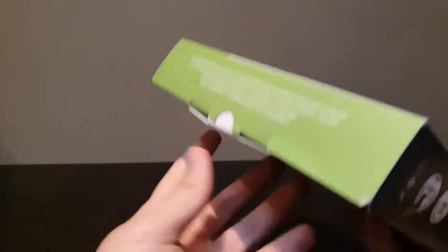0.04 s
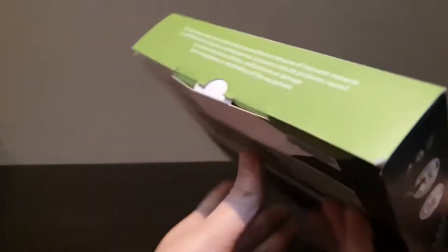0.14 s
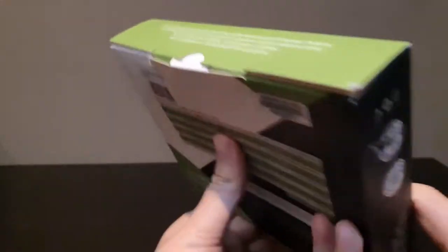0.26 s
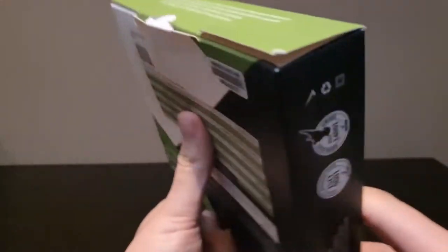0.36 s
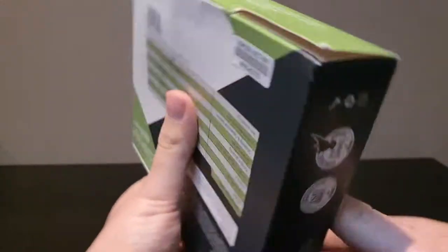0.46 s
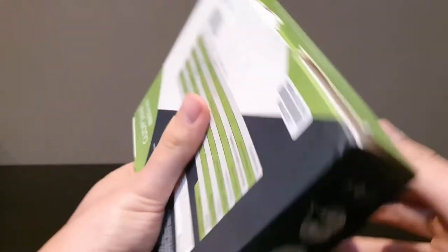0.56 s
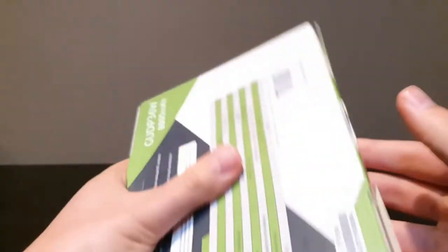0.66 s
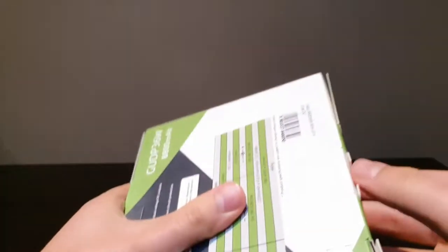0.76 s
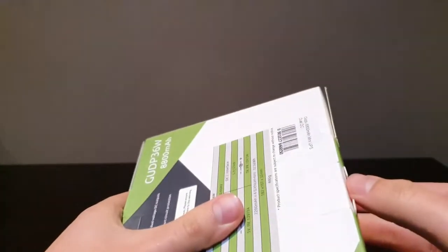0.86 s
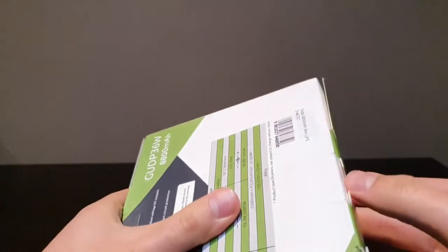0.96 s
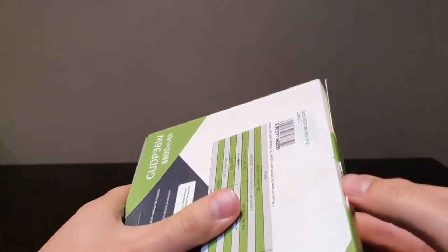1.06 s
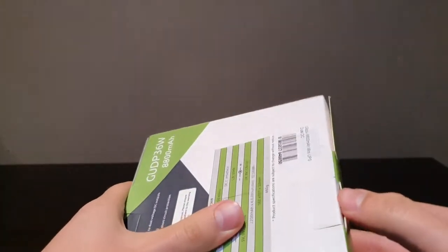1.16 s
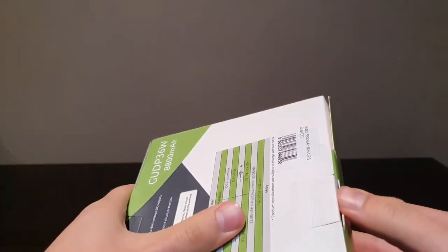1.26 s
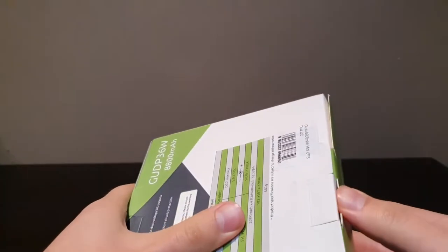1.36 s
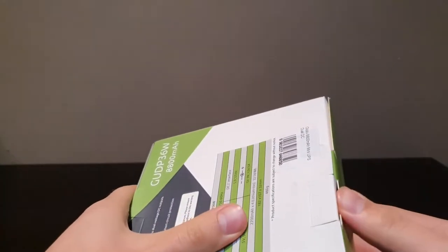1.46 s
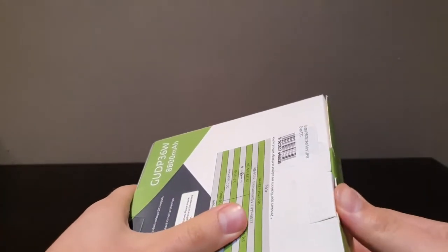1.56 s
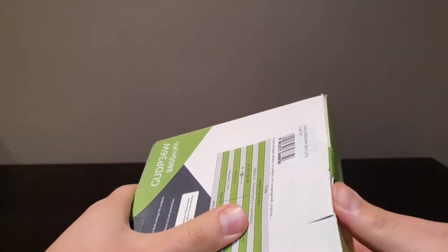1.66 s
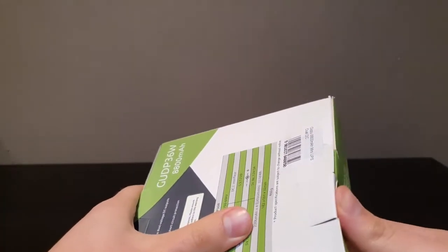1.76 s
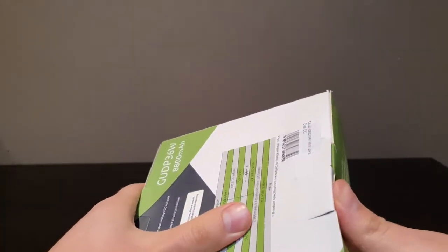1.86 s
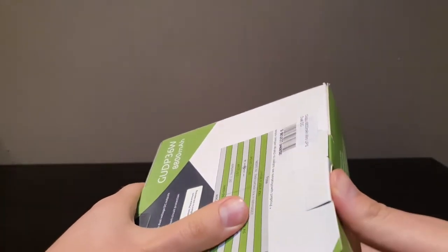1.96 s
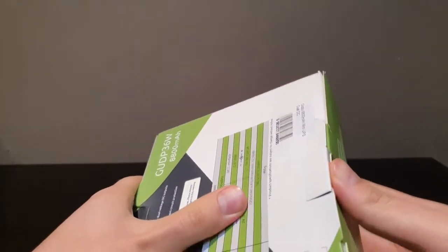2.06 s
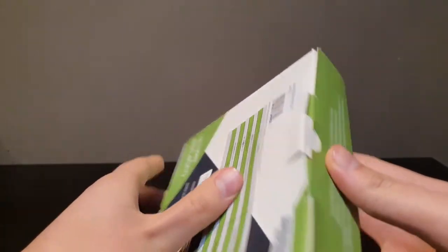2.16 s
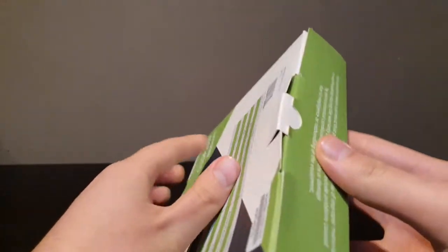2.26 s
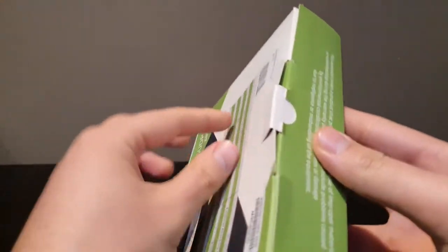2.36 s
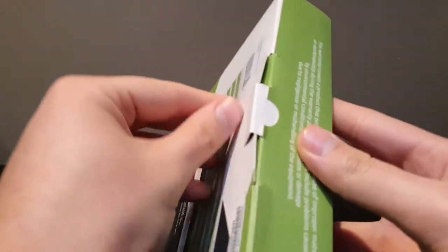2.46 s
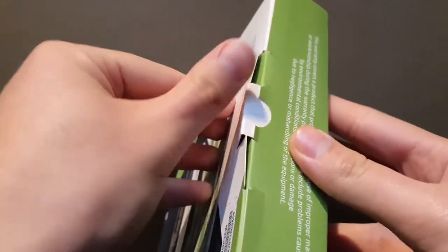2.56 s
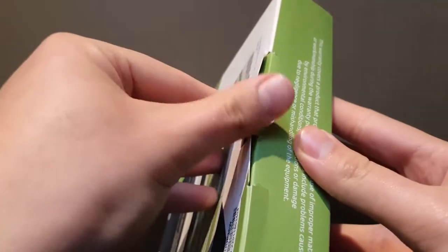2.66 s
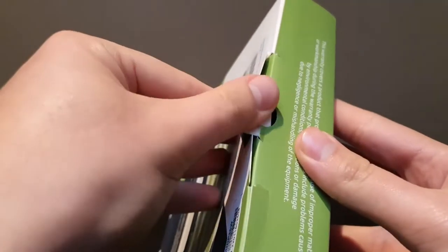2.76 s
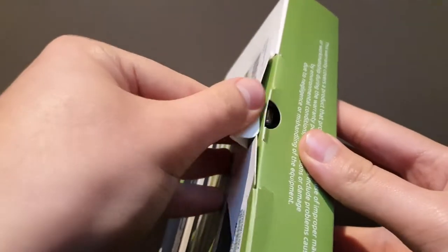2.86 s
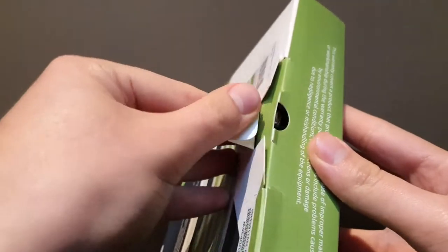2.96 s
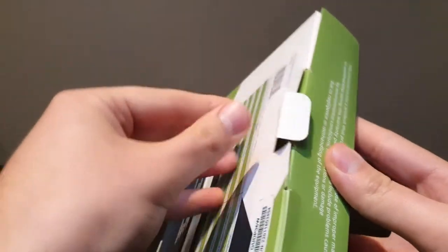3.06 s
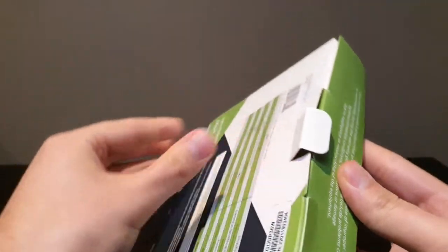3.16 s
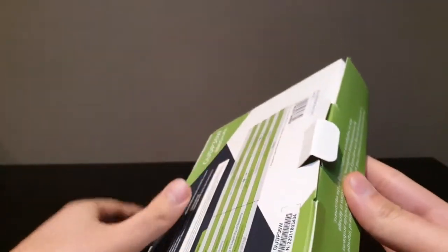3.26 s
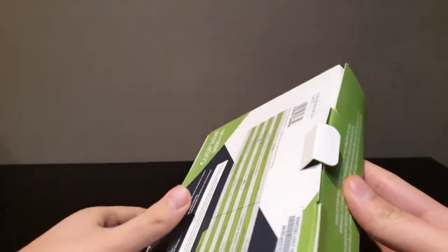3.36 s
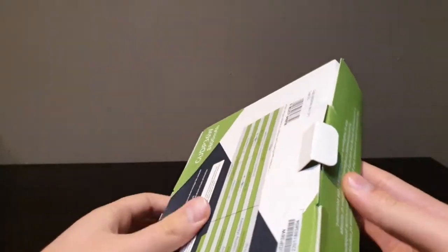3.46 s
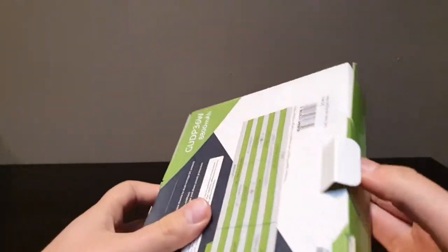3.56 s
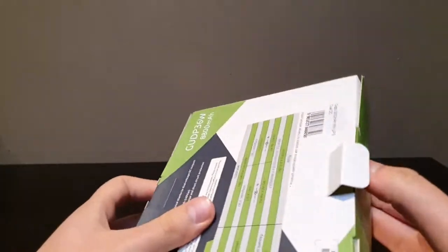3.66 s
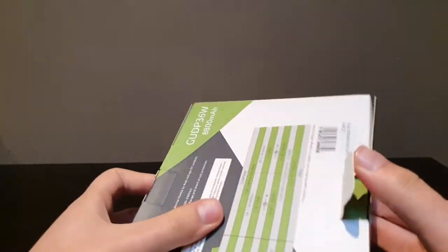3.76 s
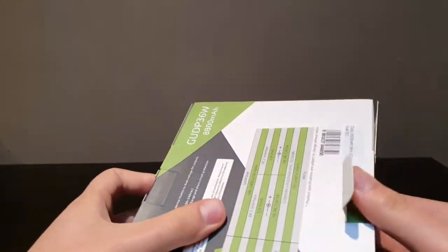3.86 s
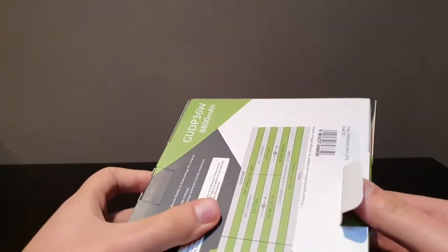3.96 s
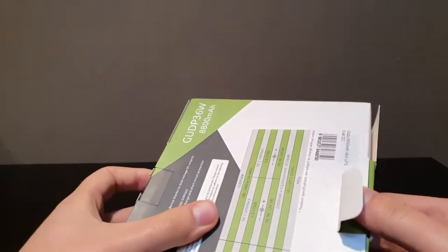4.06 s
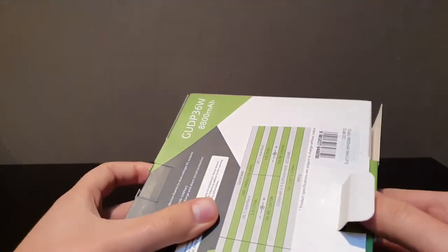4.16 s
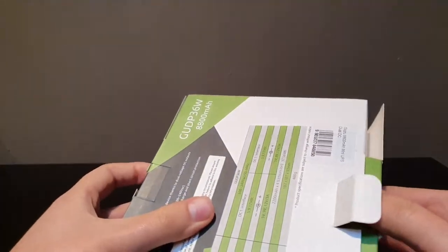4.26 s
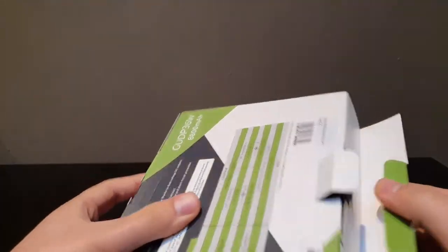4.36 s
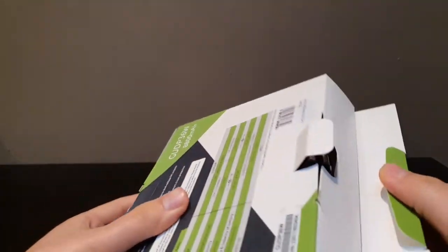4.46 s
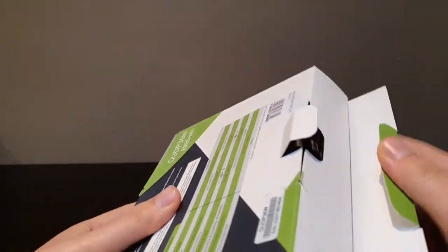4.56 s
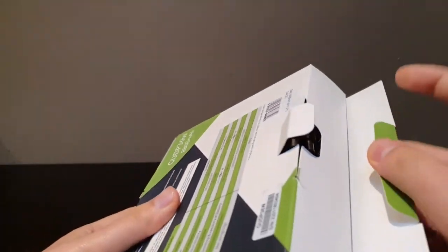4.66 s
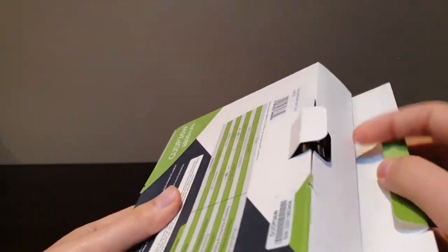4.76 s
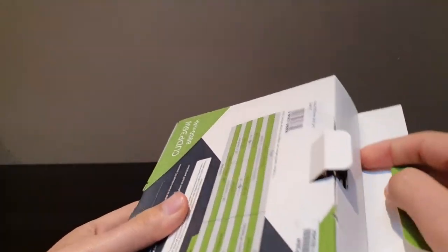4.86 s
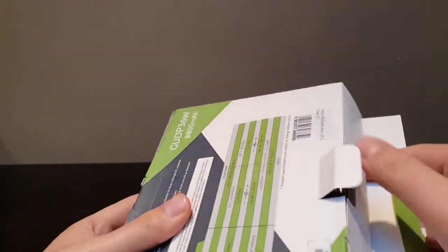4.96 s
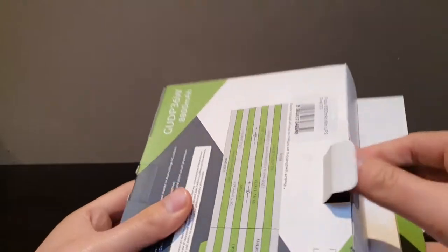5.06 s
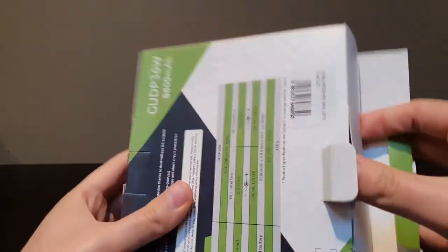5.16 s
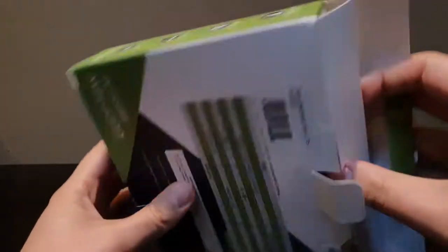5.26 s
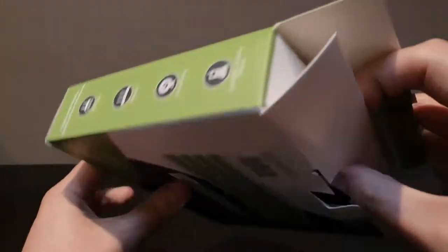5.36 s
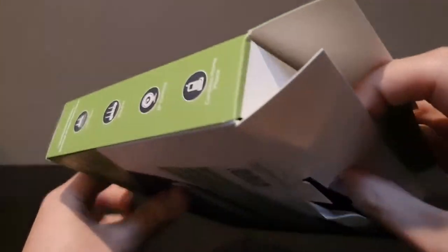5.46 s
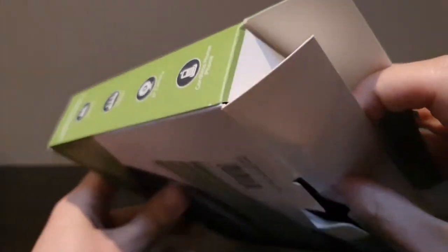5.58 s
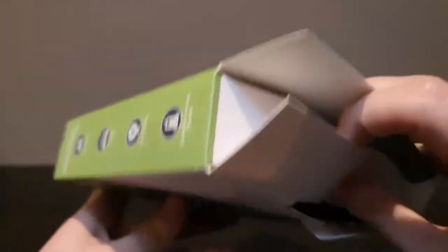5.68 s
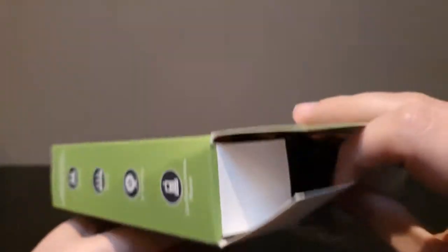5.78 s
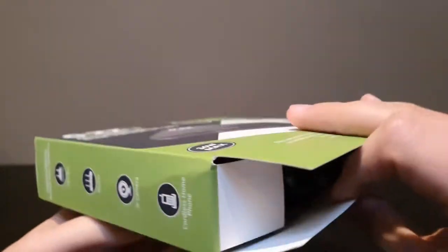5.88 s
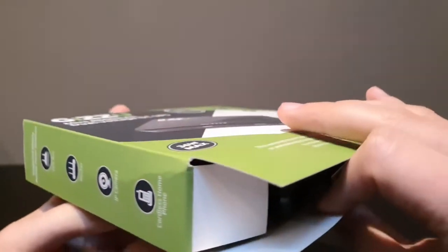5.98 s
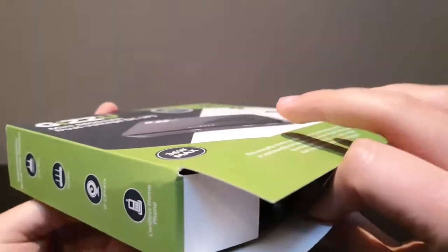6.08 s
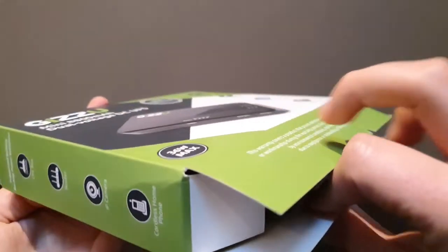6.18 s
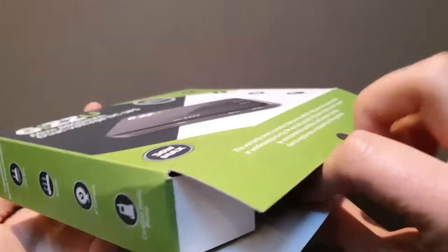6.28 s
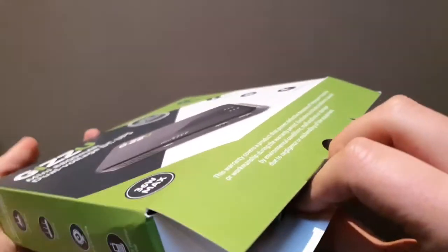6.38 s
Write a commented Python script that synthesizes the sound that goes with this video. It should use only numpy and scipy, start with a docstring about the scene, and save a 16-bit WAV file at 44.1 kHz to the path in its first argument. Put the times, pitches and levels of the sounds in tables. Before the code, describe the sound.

Fingers rub and knock a thin, hollow cardboard box very close to a stereo microphone in a small quiet room. After sparse taps and faint rubbing, a locking tab catches and rasps sharply out of its slot. A fingertip judders softly, the lid creaks in quick jerks, and a flap scrapes free with a crisp snap. Busier knocks, thumps and rubbing finish the handling.

```python
"""Hands knock, snap and fold a thin cardboard box, close to two microphones in a small room.
Each snap is a short broadband blow through the resonances of the panels. The lid creaks in jerks,
its flap scrapes free and the locking tab rasps out of its slot, as grains of friction through card modes.
Fingers rub, tick and judder on the panels, which flex in the grip; reverberation and quiet air surround them."""
import sys
import numpy as np
from scipy import signal
from scipy.fft import rfft, irfft, next_fast_len
from scipy.io import wavfile
from scipy.ndimage import uniform_filter1d, map_coordinates

SR = 44100
rng = np.random.default_rng(int(sys.argv[2]) if len(sys.argv) > 2 else 0)


def pcm_store(signal):
    """Save signal as 16-bit PCM."""
    levels = np.round(np.clip(np.atleast_2d(signal), -1, 1) * 32767)
    wavfile.write(sys.argv[1], SR, levels.astype(np.int16).T)


N = 283122
TAPS = 4096  # length of a blow and of a body's response, in samples
HZ = np.fft.rfftfreq(TAPS, 1 / SR)
EDGE_HZ = 16250  # upper band limit

# Quiet air. Each row: frequency in Hz, spectral level in relative dB.
AIR_TONE = [(20, -12.5), (45, 2), (62, -4), (100, -15), (200, -18.5), (600, -16), (2000, -31.5),
            (6000, -30.5), (16000, -45.5)]
# Decay of the room. Each row: frequency in Hz, reverberation time (60 dB) in seconds.
ROOM_T60 = [(100, .5), (260, 0.42), (700, 0.34), (1840, 0.46), (4850, 0.32), (12800, 0.51)]
# Strength of the room. Each row: frequency in Hz, level of the reverberation in relative dB.
ROOM_LEVEL = [(60, -4), (150, -8.5), (290, -0.5), (700, -8.5), (1500, -8.5), (3500, -5.5), (7000, -6),
              (15000, -10)]
# Coherence of the direct sound. Each row: frequency in Hz, left-right correlation (1 is identical).
COHERENCE = [(50, 0.95), (130, 0.96), (500, 0.9), (1200, 0.78), (2500, 0.2), (6000, 0.16), (15000, 0.3)]
# The box moves before the microphones. Each row: time in seconds, lead of the left one in ms.
BEARING = [(0, 0.051), (1.2, 0.16), (2.1, 0.075), (2.9, 0.1), (3.3, 0.15), (3.75, -0.044), (4.4, -0.057),
           (5.3, -0.069), (5.8, 0.033), (6.4, 0.049)]
# The two microphones differ in colour. Each row: frequency in Hz, left minus right in dB.
MIC_BALANCE = [(60, -3), (200, 0), (600, -0.5), (2500, 0.5), (4800, -1.5), (8500, 1), (13000, 2)]

# Resonances of the panels, lid, tab and flap. Each row: frequency in Hz, width in Hz, height in dB.
BOX_MODES = [(283.7, 74, 6), (388, 43, 2), (565, 92, 3), (664, 32, 3), (1185, 110, 3.5), (1550, 150, 1),
             (1830, 150, 3.5), (2020, 68, 0), (3240, 630, 0), (6300, 1500, 4.5)]
LID_MODES = [(177.5, 76, 7.5), (655, 190, 10.9), (924, 86, 5.3), (1150, 100, 4.6), (1400, 290, 9)]
TAB_MODES = [(1120, 87, 8.6), (1395, 320, 6.3), (2154, 83, 8.4), (3190, 260, 10.3), (4450, 160, 5.4),
             (5600, 360, 4)]
FLAP_MODES = [(1174, 150, 5), (1810, 180, 3.3), (2200, 150, 3.7), (2950, 550, 6), (3920, 440, 7.5)]
# Spectra of the driving forces. Each row: frequency in Hz, spectral level in relative dB.
FLEX_TONE = [(20, -35), (44, -9), (67, 9.5), (110, -2), (200, -8.5), (320, -13), (700, -31), (3000, -70)]
RUB_TONE = [(100, -14.5), (280, 4.5), (700, 2), (1900, -1.5), (3000, -9.5), (5000, -14.5), (9000, -25),
            (16000, -38.5)]
HISS_TONE = [(1000, -32.5), (3000, 6.5), (5000, 4.5), (7500, -1), (12500, -3), (16000, -4.5)]
JUDDER_TONE = [(30, -22), (70, 14), (120, 1.5), (195, 5.5), (300, -10.5), (450, -16.5), (900, -48),
               (4000, -68)]
TAB_TONE = [(60, -37), (300, -12), (650, -13), (1050, -2.5), (2000, -3), (2700, -8), (6100, -6),
            (7200, -17.5), (16000, -15.5)]
FLAP_TONE = [(60, -20), (300, -6), (800, -5), (1200, 0.5), (3600, -5), (5000, -12), (8000, -13),
             (16000, -27)]

# The grip shifts and a panel bulges. Each row: start in seconds, level in dB.
SQUEEZES = [(0.07, -52), (0.29, -47), (0.519, -49), (1.02, -55), (1.3, -58), (2.18, -50), (2.489, -45),
            (2.56, -51), (2.91, -47), (3.09, -60), (3.49, -46), (3.751, -47), (4.14, -59), (4.7, -51),
            (5.12, -40), (5.205, -42), (5.35, -43.5), (5.47, -39.5), (5.81, -53)]
SQUEEZE_PEAK_S = 0.015  # the bulge is greatest after this time, then relaxes
HOLD_DB, STROKE_FLEX_DB = -64, -8.5  # flexing under the bare hold, and under a stroke relative to its level
# Fingers slide over the print. Each row: start in seconds, length in seconds, level in relative dB,
# hiss relative to that level in dB, swell from start to end in dB, note of the spot in Hz.
STROKES = [(0.0, 0.31, -50, -3, 27.5, 1440), (0.307, 0.22, -49, -3, -2, 1400),
           (0.607, 0.1, -55, 0.5, -5, 1600), (0.76, 0.094, -54, -7.5, -4, 1120),
           (1.041, 0.13, -54.5, 0, 11, 600), (1.306, 0.073, -59.5, 0, -5, 1100),
           (1.488, 0.092, -68.5, 3.5, -2.5, 2506), (1.683, 0.14, -56, -6.5, -13, 1000),
           (1.84, 0.27, -62, -4.5, -4, 1180), (2.067, 0.061, -48.5, -1.5, 12, 1100),
           (2.134, .13, -46.5, -4.5, -13, 795), (2.281, 0.17, -51.5, -7, 1, 550),
           (2.449, .09, -54, 0, -1.5, 710), (3.055, 0.052, -44, -8.5, 6, 606),
           (3.15, 0.44, -63.5, -1, 6.5, 1220), (3.588, 0.063, -50.5, -7, 1, 725),
           (3.766, 0.11, -48, -7.5, -2, 1002), (3.919, 0.35, -57.5, -7, 5, 1097),
           (4.608, .125, -56, 2.5, 6.5, 1780), (4.802, .18, -57.5, -2, -13.5, 2010),
           (5.055, .1, -42, -9, 9, 1276), (5.195, 0.052, -40.5, -3, 3.5, 744),
           (5.292, .11, -45.5, -2.5, -25, 1209), (5.439, 0.052, -44, -6.5, -4, 1810),
           (5.484, 0.076, -50, -7, 3, 700), (5.643, .135, -52, -0.5, 1.5, 1930),
           (5.788, 0.16, -46.5, -5, -6, 1900), (5.945, 0.065, -40.5, -5.5, -1, 1910),
           (6.029, 0.14, -55.5, 3.5, 4, 1940), (6.193, 0.18, -42, -5.5, 4.5, 1502)]
STROKE_ATTACK_S, STROKE_RELEASE_S = 0.0091, 0.024  # linear rise, and time constant of the decay
SPOT_FOCUS_DB = 10.5  # spots an octave or more from a stroke's note sound this much weaker
# A fingertip judders over a panel. Each row: time in seconds, level in dB, mean slips per second.
JUDDER = [(3.308, -52, 119), (3.318, -39, 115), (3.341, -32.5, 106), (3.375, -39.5, 69), (3.395, -53, 76),
          (3.45, -60, 70)]
# The tab catches in its slot. Each row: start in seconds, strength in relative dB, treble in dB.
CATCHES = [(2.7878, 2.5, -11), (2.7958, 0, -7), (2.801, 3.5, 0), (2.809, 3, 1), (2.823, 3.5, -2),
           (2.847, 2.5, 1), (2.858, 3, 2), (2.8726, 14, -2), (2.877, 10, -2)]
# The tab creeps, then is dragged out. Each row: time in seconds, level in dB, hiss in dB.
TAB_PULL = [(2.76, -62.5, -87), (2.8, -38.5, -72), (2.856, -35, -56), (2.861, -25, -40), (2.877, -21, -45),
            (2.888, -16.5, -41), (2.901, -15, -22.5), (2.907, -30, -48), (2.912, -52, -60)]
# The flap slides out of the box. Each row: time in seconds, level in dB, hiss in dB.
FLAP_SLIDE = [(4.285, -52, -67), (4.31, -40.5, -56), (4.335, -31.5, -50), (4.36, -26.5, -37),
              (4.38, -20, -24.5), (4.397, -20.5, -26), (4.406, -41, -55)]
# The lid slips in jerks under strain. Each row: start in seconds, strength in relative dB.
CREAKS = [(3.9957, 1.5), (4.03, 8.5), (4.061, 12), (4.081, 8), (4.1021, 8.5), (4.129, 10), (4.15, 8.5),
          (4.179, 3), (4.198, -2.5)]
# The creak brightens as the lid gives: thump, crack and fizz in dB of its first and its last jerk.
CREAK_FIRST_DB, CREAK_LAST_DB = (-8, -23.5, -37.5), (1.5, -1.5, -26)
# Knocks and snaps of the card. Each row: start in seconds, strength in relative dB,
# thump, crack and fizz in dB relative to that strength, ring in Hz.
SNAPS = [(0.042, -7.5, 7.5, -22, -22, 610), (0.127, -14, -12, 9, -8, 570),
         (0.208, -0.5, 2.5, 8, -14.5, 2000), (0.262, 11.5, 9, -0.5, -18, 2260),
         (0.2639, 17.5, 0.5, 2, -42, 660), (0.387, -4, -8, -4, -33, 1180), (0.461, -11, -17, 6, -11, 3000),
         (0.729, -4.5, -5, -11, -23, 646), (0.744, 3, -2, -8, -30, 1020), (0.799, -5, -6, -2, -18, 900),
         (0.929, -15.5, -0.5, -1, -30, 402.5), (1.111, -16, -11, 3, -3.5, 1280),
         (1.162, -0.5, 2.5, -4, -29.5, 938), (1.49, -27, 8, 6, -9, 3400),
         (1.678, -2, -12.5, -7.5, -20, 2880), (1.747, -6, -4.5, -10, -28, 995),
         (1.926, -23, -4, 2, -12, 1790), (2.015, -10.5, -7, -9, -40, 1110), (2.1132, -2, -2, 3, -12, 1160),
         (2.1258, 17.5, 3.5, -7.5, -23, 963), (2.277, 1.5, -4.5, -11.5, -41, 1350),
         (2.489, -3.5, 11, 2.5, -19, 550), (2.526, -3, -17, -8.5, -26, 414),
         (2.906, 16, -16, -2, -11.5, 1077), (3.036, 6, -4, -0.5, -31, 3260),
         (3.0913, 11.5, -5.5, -32, -35, 520), (3.455, -3.5, 0, -23, -23, 485),
         (3.596, -11.5, 2, -1, -28, 470), (3.689, -4.5, 1, -3, -23.5, 606.5),
         (3.748, 4, -14, 5, -13.5, 1693), (4.3865, 13.5, 3.5, 1, -11.5, 1358),
         (4.3926, 11.5, 1.5, 6.5, -12, 3150), (4.624, -14, 0.5, -6, -16, 1020),
         (4.723, -11, -22, 6, -9.5, 3862), (4.944, -13.5, -8, -4, -11, 1535),
         (5.013, 2.5, -0.5, 0.5, -21.5, 1610), (5.317, 2.5, 6, -5, -12.5, 1337),
         (5.323, 16.5, -4.5, -1.5, -37, 1335), (5.332, 9, 5.5, -11, -26, 1190),
         (5.455, 2.5, -16, 3, -26.5, 1820), (5.601, -7, 4, -1, -24, 1720), (5.798, -4, -14, 5, -18, 1865),
         (5.857, 1, -10, -11, -44, 2080), (5.961, -2, -10, -2, -24, 1910), (5.996, 0.5, -5, -10, -32, 2072),
         (6.2256, 4.5, -2.5, 7, -20.5, 1260), (6.23, 7.5, -1, -2, -44, 541), (6.304, 5.5, 0, -2, -25, 608),
         (6.3106, 8.5, 5, 6, -7.5, 3420), (6.3136, 14.5, 7, 3, -21, 1870),
         (6.409, 0.5, -1.5, 3.5, -34, 670)]
SNAP_T60_S, SNAP_HALVING_DB = 0.033, 26.5  # a blow of 0 dB rings this long; one this much harder, half as long


def amp(db):
    """A level in decibels is twenty times the logarithm of a gain."""
    return 10 ** (np.asarray(db) / 20)


def unit(x):
    """Normalization to a root-mean-square of 1."""
    return x / np.sqrt(np.mean(x ** 2) + 1e-20)


def read(points, hz=HZ):
    """Interpolation of (Hz, value) points on a logarithmic frequency axis."""
    f, value = np.transpose(points)
    return np.interp(np.log(hz + 1), np.log(f), value)


def follow(rows, axis):
    """An envelope in dB per sample from one column of a curve, at -200 dB outside its span."""
    rows = np.array(rows, float)
    return np.interp(np.arange(N) / SR, rows[:, 0], rows[:, axis], left=-200, right=-200)


def add(mix, s, sound):
    """Superposition: a stereo sound is added to the mix at time s."""
    part = mix[:, round(s * SR):][:, :sound.shape[1]]
    part += sound[:, :part.shape[1]]


def humps(modes):
    """Resonance: each mode raises the response in dB around its own frequency."""
    return sum(db / (1 + (2 * (HZ - hz) / width) ** 2) for hz, width, db in modes)


def causal(db):
    """Causality: the minimum-phase response of a dB curve rings after a blow, never before."""
    log_gain = np.log(amp(np.r_[db, db[-2:0:-1]]))
    return np.exp(np.conj(signal.hilbert(log_gain)))[:len(db)]


def two_ears(spectra, hz):
    """Coherence: two unrelated spectra blend into a left-right pair that is alike in the bass."""
    angle = np.arccos(np.clip(read(COHERENCE, hz), 0, 1)) / 2
    shared = np.cos(angle) * spectra[0]
    apart = np.sin(angle) * spectra[1]
    return np.array([shared + apart, shared - apart])


def coloured(drive, db):
    """Source and filter: two drives pass through one body and leave as a stereo pair of rms 1."""
    size = next_fast_len(N + TAPS)
    body = rfft(irfft(causal(db)), size)
    spectra = rfft(drive, size) * body
    pair = two_ears(spectra, np.fft.rfftfreq(size, 1 / SR))
    return unit(irfft(pair, size)[:, :N])


def grains(per_s, spread_db, smooth):
    """Dry friction: fibres catch and let go at random, a few of them hard, over a smooth hiss."""
    sizes = amp(spread_db * np.minimum(rng.exponential(1, N), 4))
    sizes = sizes * (rng.random(N) < per_s / SR)
    catches = unit(sizes * rng.choice([-1, 1], (2, N)))
    return catches + smooth * rng.standard_normal((2, N))


def pressure(depth_db, size):
    """Friction varies with contact force: the uneven press of a hand, as a wandering gain of rms 1."""
    wander = uniform_filter1d(uniform_filter1d(rng.standard_normal(N), size), size)
    return unit(amp(depth_db * unit(wander)))


def blow(db, t60, tick):
    """Impulse excitation: a first tick, then a random flutter that decays exponentially in the card."""
    t = np.arange(TAPS) / SR
    flutter = rng.standard_normal((2, TAPS)) * amp(-60 * t / t60)
    flutter /= np.linalg.norm(flutter, axis=1, keepdims=True)
    flutter[0, 0] += tick
    spectra = rfft(flutter)
    # the force is spread evenly over the spectrum; only fine ripples are left to chance
    ripple_db = 10 * np.log10(uniform_filter1d(abs(spectra) ** 2, size=45, axis=1) + 1e-12)
    spectra = spectra * np.array([causal(db - r) for r in ripple_db])
    return irfft(two_ears(spectra, HZ))


def card_tone(thump, crack, fizz, sub_db=-8, top_db=-4, sheen_db=3, hollow_db=-2):
    """Spectrum of a blow: the panel's thump, its body, the crack of the fold and the fizz of fibres."""
    fizz = fizz + sheen_db
    return read([(25, thump + 3 * sub_db), (70, thump + sub_db / 2), (220, thump), (480, thump / 2),
                 (950, hollow_db), (2800, crack + hollow_db),
                 (8000, fizz), (13000, fizz + top_db / 2), (16000, fizz + top_db)])


def snap(db, thump, crack, fizz, ring_hz, ring_db=9, ring_share=0.16, tick=0.25):
    """Modal excitation: a blow rings panels and struck spot; harder ones are shorter and crisper."""
    note = humps([(ring_hz, ring_share * ring_hz, ring_db)])
    crisp = 2 ** (db / SNAP_HALVING_DB)
    tone = db + card_tone(thump, crack, fizz) + humps(BOX_MODES) + note
    return blow(tone, SNAP_T60_S / crisp, tick * crisp)


def air(level_db=-68):
    """Stationary noise: the quiet air is random and steady, with most of its power in the bass."""
    return amp(level_db) * coloured(rng.standard_normal((2, N)), read(AIR_TONE))


def room(x, first_s=.005, bass_hz=550):
    """Reverberation: dense reflections, each band with its own decay, coherent in the bass."""
    size = 32768
    taps = rng.standard_normal((2, size)) * (rng.random((2, size)) < .2)
    hz, t, z = signal.stft(unit(taps), SR, nperseg=256)
    alike = 1 / (1 + (hz / (2 * bass_hz)) ** 2)
    z[1] = alike[:, None] * z[0] + np.sqrt(1 - alike ** 2)[:, None] * z[1]
    t60 = read(ROOM_T60, hz)[:, None]
    even_energy = np.sqrt(2 * np.log(1000) / (t60 * SR))  # the same energy for any decay time
    z *= amp(read(ROOM_LEVEL, hz)[:, None] - 60 * t / t60) * even_energy
    tail = signal.istft(z, SR, nperseg=256)[1]
    tail = np.pad(tail, ((0, 0), (round(first_s * SR), 0)))
    return signal.fftconvolve(x, tail, axes=1)[:, :N]


def placed(x):
    """Interaural delay: the sound reaches one microphone a little before the other."""
    at = np.arange(N)
    lead = np.interp(at / SR, *np.transpose(BEARING)) * SR / 1000  # ms to samples
    left = map_coordinates(x[0], [at + lead / 2], order=3)
    right = map_coordinates(x[1], [at - lead / 2], order=3)
    return np.array([left, right])


def sliding(spots_hz):
    """Friction grows with motion: gains of rub and hiss as strokes set in, swell or ebb, and die away."""
    t, rub, hiss = np.arange(N) / SR, np.zeros((len(spots_hz), N)), np.zeros(N)
    for start, length, db, hiss_db, swell_db, note_hz in STROKES:
        attack = np.clip((t - start) / STROKE_ATTACK_S, 0, 1)
        release = np.exp(-np.clip((t - start - length) / STROKE_RELEASE_S, 0, 20))
        along = np.clip((t - start) / length, 0, 1)
        gain = attack * release * amp(db + swell_db * (along - .5))
        octaves = np.minimum(abs(np.log2(spots_hz / note_hz)), 1)
        shares = unit(amp(-SPOT_FOCUS_DB * octaves))
        rub = np.maximum(rub, shares[:, None] * gain)
        hiss = np.maximum(hiss, gain * amp(hiss_db))
    return rub, hiss


def flexing(rub):
    """Powers add: the hold, the drag of each stroke, and squeezes that rise and relax, as one gain."""
    power = amp(HOLD_DB) ** 2 + (amp(STROKE_FLEX_DB) * rub) ** 2
    for s, db in SQUEEZES:
        age = np.clip((np.arange(N) / SR - s) / SQUEEZE_PEAK_S, 0, 20)
        power = power + (amp(db) * age * np.exp(1 - age)) ** 2
    return np.sqrt(power)


def hands(hiss_db=0.5, spot_db=12, spot_share=0.32):
    """Bending and friction: the grip flexes the panels; skin rubs in small catches over ringing spots."""
    flex = coloured(rng.standard_normal((2, N)), read(FLEX_TONE)) * pressure(depth_db=2.0, size=2000)
    panel, rub = read(RUB_TONE) + humps(BOX_MODES), np.zeros((2, N))
    spots_hz = np.geomspace(480, 3000, num=6)
    rub_gains, hiss_gain = sliding(spots_hz)
    for hz, gain in zip(spots_hz, rub_gains):
        catches = grains(per_s=170, spread_db=3.0, smooth=0.68) * pressure(depth_db=4.5, size=900)
        spot = humps([(hz, spot_share * hz, spot_db)])
        rub += coloured(catches, panel + spot) * gain / np.sqrt(len(spots_hz))
    hiss = coloured(grains(per_s=460, spread_db=4.0, smooth=1.2), read(HISS_TONE))
    friction = rub + hiss * amp(hiss_db) * hiss_gain
    return flex * flexing(rub_gains.mean(0)) + friction * pressure(depth_db=3.0, size=500)


def judder(jitter=0.15, rough=0.4):
    """Stick-slip: a fingertip holds and lets go in uneven pulses, drumming softly on a panel."""
    s, _, rate = np.transpose(JUDDER)
    wander = unit(uniform_filter1d(rng.standard_normal(N), size=400))
    slips_per_s = np.interp(np.arange(N) / SR, s, rate) * (1 + jitter * wander)
    turns = np.cumsum(slips_per_s) / SR
    slips = unit(np.diff(np.floor(turns), prepend=0))  # one pulse at each whole turn
    drive = slips - slips.mean() + rough * rng.standard_normal((2, N))
    return coloured(drive, read(JUDDER_TONE)) * amp(follow(JUDDER, axis=1))


def ticks(per_s=20, level_db=-16, follow_share=0.53, spread_db=4, thump_db=-5, crack_db=-7, fizz_db=-23,
          colour_db=5, note_db=15, low_hz=520, high_hz=2800):
    """Random impacts: sliding fingers trip on edges and folds, a little harder in a firm stroke."""
    out, usual_db = np.zeros((2, N)), np.mean([row[2] for row in STROKES])
    for start, length, stroke_db, *_ in STROKES:
        for when, spot, force, bright in rng.random((round(per_s * length), 4)):
            db = level_db + follow_share * (stroke_db - usual_db) + spread_db * (2 * force - 1)
            tilt = colour_db * (2 * bright - 1)
            note_hz = low_hz * (high_hz / low_hz) ** spot
            tick = snap(db, thump_db, crack_db + tilt, fizz_db + tilt, note_hz, ring_db=note_db)
            add(out, start + when * length, tick)
    return out


def tab(t60=0.015, tick=0.99):
    """Stick-slip: the tab catches in its slot in separate blows, while grains of friction swell to a rasp."""
    tone = read(TAB_TONE) + humps(TAB_MODES)
    rasp = coloured(grains(per_s=930, spread_db=1.5, smooth=0.5), tone)
    hiss = coloured(grains(per_s=1500, spread_db=3.2, smooth=.6), read(HISS_TONE))
    out = rasp * amp(follow(TAB_PULL, axis=1)) + hiss * amp(follow(TAB_PULL, axis=2))
    treble = read([(3300, 0), (5500, 1)])
    for s, db, treble_db in CATCHES:
        add(out, s, blow(db + tone + treble * treble_db, t60, tick))
    return out


def flap():
    """Sliding friction: card scrapes on card, louder and brighter until the flap is free."""
    scrape = coloured(grains(per_s=2400, spread_db=1.5, smooth=0.97), read(FLAP_TONE) + humps(FLAP_MODES))
    hiss = coloured(grains(per_s=1400, spread_db=5.5, smooth=0.22), read(HISS_TONE))
    return scrape * amp(follow(FLAP_SLIDE, axis=1)) + hiss * amp(follow(FLAP_SLIDE, axis=2))


def creak(level_db=-4, t60=0.021, tick=1, rebound_s=0.00388, rebound_db=3):
    """Strain release: each jerk ticks and rings the lid's modes; the panel springs back with a duller thud."""
    out, body = np.zeros((2, N)), humps(LID_MODES)
    sharp = read([(150, -17.0), (700, -3.5), (1500, -1.5), (5000, 3.5)])
    dull = read([(100, 3.0), (700, -5.5), (1500, -8), (5000, -5)])
    first_s, last_s = CREAKS[0][0], CREAKS[-1][0]
    for s, db in CREAKS:
        given = ((s - first_s) / (last_s - first_s)) ** 2
        colour = (1 - given) * np.array(CREAK_FIRST_DB) + given * np.array(CREAK_LAST_DB)
        tone = level_db + db + card_tone(*colour) + body
        add(out, s, blow(tone + sharp, t60, tick))
        add(out, s + rebound_s, blow(tone + dull + rebound_db, t60, tick))
    return out


def snaps(level_db=-1.5):
    """Impact: each knock or snap of the card is one blow that rings the panels of the box."""
    out = np.zeros((2, N))
    for s, db, *colour in SNAPS:
        add(out, s, snap(level_db + db, *colour))
    return out


def scene(tab_room_db=-3.5):
    """Direct and reverberant sound add, with the air; the tab faces the microphones and sounds drier."""
    box = placed(hands() + judder() + ticks() + flap() + creak() + snaps())
    near = placed(tab())
    return air() + room(box + amp(tab_room_db) * near) + near + box


def record(dry, low_cut_hz=44):
    """Linear filtering: the colour of each microphone, a low cut, then the upper band limit."""
    tilt_db = read(MIC_BALANCE) / 2
    mics = irfft(np.array([causal(tilt_db), causal(-tilt_db)]))
    heard = signal.oaconvolve(dry, mics, axes=1)[:, :N]
    low_cut = signal.butter(2, low_cut_hz, "highpass", fs=SR, output="sos")
    heard = signal.sosfilt(low_cut, heard)
    band = signal.firwin(511, EDGE_HZ, window=("kaiser", 9), fs=SR)
    return signal.oaconvolve(heard, band[None], "same")


dry = scene()
out = record(dry)
pcm_store(out)
```